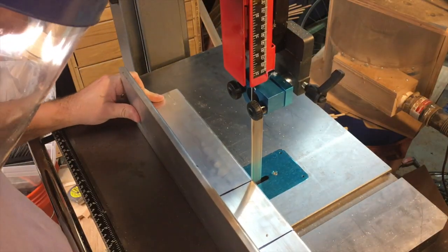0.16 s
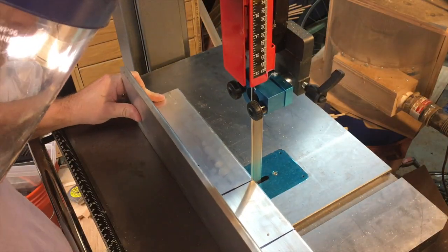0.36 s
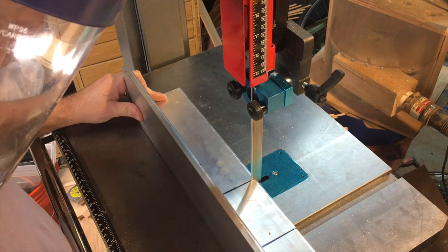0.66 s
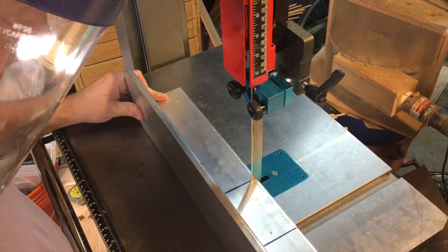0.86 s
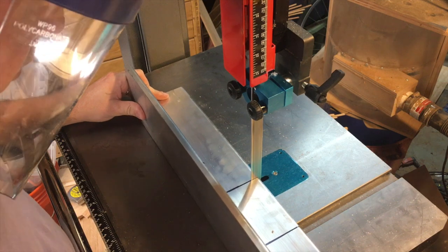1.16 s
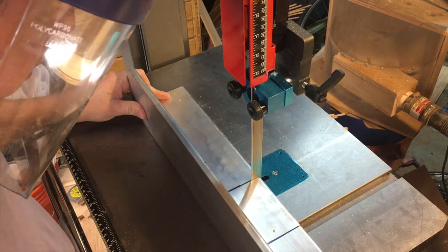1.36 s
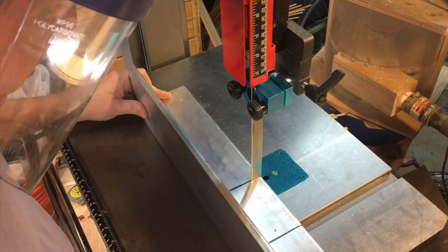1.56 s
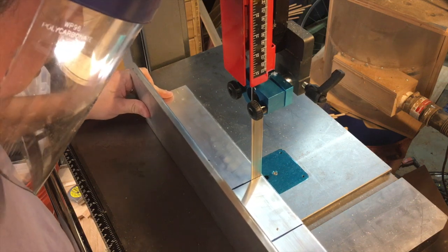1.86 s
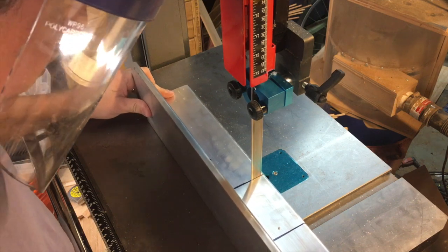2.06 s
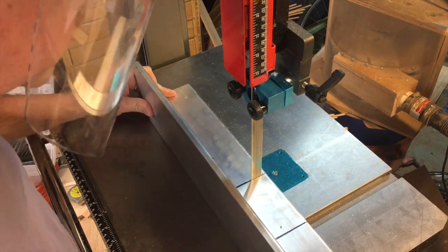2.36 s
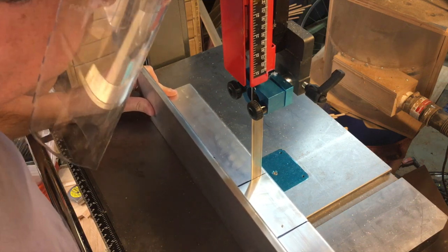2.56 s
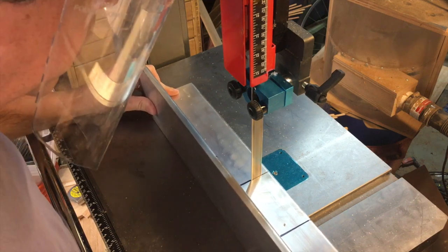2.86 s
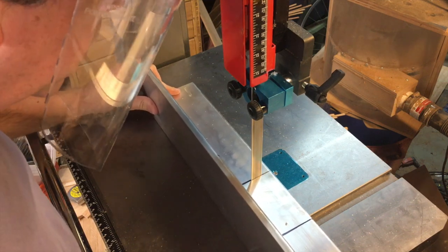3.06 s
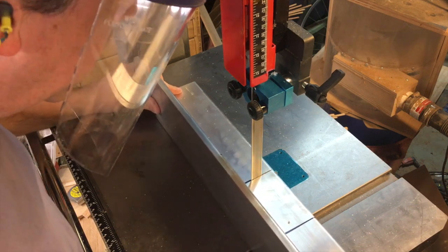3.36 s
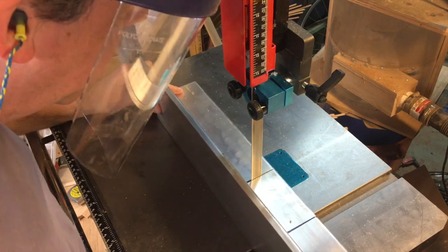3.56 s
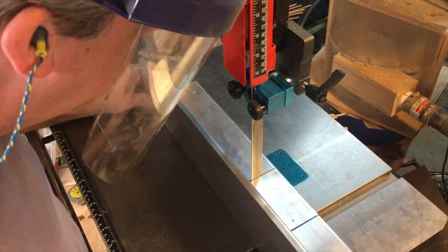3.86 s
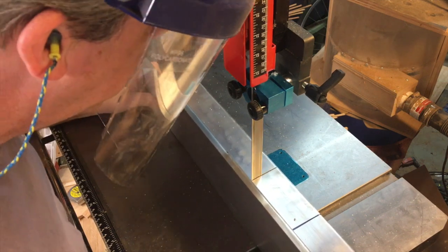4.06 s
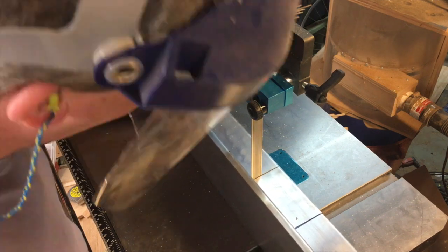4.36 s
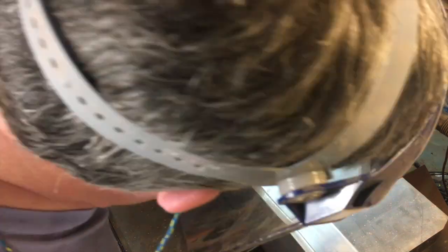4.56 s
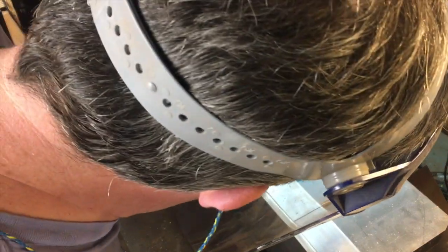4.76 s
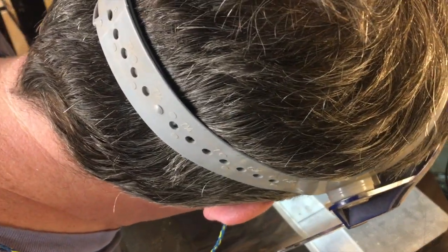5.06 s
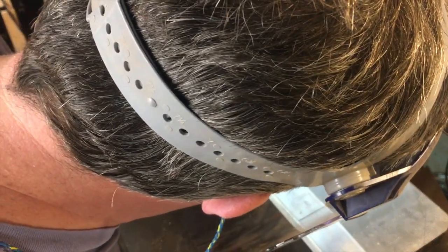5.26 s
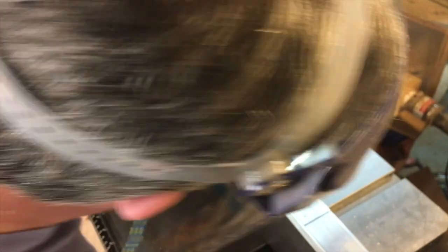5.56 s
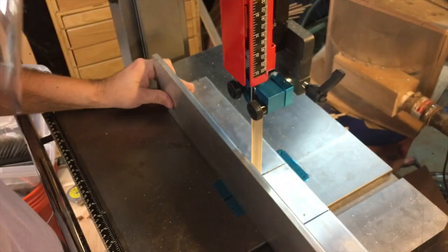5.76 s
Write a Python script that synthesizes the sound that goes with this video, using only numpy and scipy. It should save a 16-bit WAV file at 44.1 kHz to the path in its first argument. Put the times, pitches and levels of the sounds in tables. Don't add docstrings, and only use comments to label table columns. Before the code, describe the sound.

Continuous metal sawing, already under way at the start and never stopping. Teeth hiss and chatter sharply through plate, with shifting high rings, over throbbing motor hum and an extractor's constant whine. Around one and a half to two seconds the frame sings loudest; later the cutting becomes softer and duller, and a faint falling moan passes. Close, thin phone sound with little bass.

```python
import sys
import numpy as np
from scipy import signal
from scipy.fft import rfft, irfft, next_fast_len
from scipy.io import wavfile

SR = 44100
rng = np.random.default_rng(int(sys.argv[2]) if len(sys.argv) > 2 else 0)


def boost(x):
    u = np.asarray(x, float) / 20
    return 10 ** u


def put_to_file(sound):
    columns = np.atleast_2d(sound).T
    safe = np.clip(columns, -1, 1)
    whole_steps = np.round(safe * 32767)
    wavfile.write(sys.argv[1], SR, whole_steps.astype(np.int16))


N = 261513
TIME = np.arange(N) / SR


def rms_one(x):
    return x / np.sqrt(np.mean(x ** 2) + 1e-20)


def in_time(rows):
    s, *columns = np.transpose(rows)
    return [np.interp(TIME, s, c) for c in columns]


def drift(rate_hz):
    pole = np.exp(-80 * np.pi * rate_hz / SR)
    white = rng.standard_normal(N // 40 + 2002)
    slow = signal.lfilter([1], [1, -2 * pole, pole * pole], white)[2000:]
    return np.interp(np.arange(N) / 40, np.arange(len(slow)), rms_one(slow - slow.mean()))


def coloured(x, points):
    size = next_fast_len(N)
    bin_hz = np.maximum(np.arange(size // 2 + 1) * SR / size, 1)
    point_hz, point_db = np.transpose(points)
    gain = boost(np.interp(np.log(bin_hz), np.log(point_hz), point_db))
    return rms_one(irfft(rfft(x, size) * gain, size)[:N])


def resonate(x, hz, width_hz):
    r = np.exp(-np.pi * width_hz / SR)
    poles = [1, -2 * r * np.cos(2 * np.pi * hz / SR), r * r]
    return signal.lfilter([(1 - r * r) / 2, 0, (r * r - 1) / 2], poles, x)


def body(x, modes):
    total = 0
    for k, (hz, width_hz, db) in enumerate(modes):
        total = total + (-1) ** k * boost(db) * resonate(x, hz, width_hz)
    return rms_one(total)


def ring(shake, hz, width_hz):
    pole = np.exp(-1.5 * np.pi * width_hz / SR)
    swing = signal.lfilter([1], [1, -2 * pole, pole ** 2], shake)
    cycles = np.cumsum(hz + np.zeros(len(shake))) / SR
    return rms_one(np.real(swing * np.exp(2j * np.pi * cycles)))


def spell(start_s, end_s, fade_s):
    return np.clip(np.minimum(TIME - start_s, end_s - TIME) / (2 * fade_s) + .5, 0, 1)


def order(turns, multiple, slip_rad, start_cycles):
    phase = 2 * np.pi * (multiple * turns + start_cycles) + slip_rad * drift(3.6)
    return np.sqrt(2) * np.sin(phase)


def tone(hz, wobble_hz, rate_hz):
    cycles = np.cumsum(hz + wobble_hz * drift(rate_hz)) / SR + rng.random()
    return np.sqrt(2) * np.sin(2 * np.pi * cycles)


def span_tone(rows, wobble_hz, fade_s=0.044):
    hz, level_db = in_time(rows)
    to_edge_s = np.minimum(TIME - rows[0][0], rows[-1][0] - TIME)
    gate = np.clip(to_edge_s / fade_s + 1, 0, 1)
    return gate * boost(level_db) * tone(hz, wobble_hz, 4.1)


def shaft_turns():
    # time in seconds, speed in turns per second.
    shaft = [(0, 25.86), (1, 25.81), (2.3, 25.74), (4.2, 25.74), (4.6, 25.81), (4.9, 25.75), (5.4, 25.78),
             (5.93, 25.9)]
    return np.cumsum(in_time(shaft)[0]) / SR


def bite(turns):
    turn_throb = [(1, .04), (3, .06), (4, .06), (5, .04), (6, .08), (7, .05)]
    # time in seconds, extra level in dB, half length in seconds.
    catches = [(.116, 2, .01), (.993, 2.5, .004), (1.19, 2, .008), (1.267, 2.5, .01), (1.405, 2.5, .008),
               (1.732, 2, .008), (1.926, 2, .005), (2.275, 2.5, .005), (2.57, 3, .01), (3.072, 4, .002),
               (3.118, 5, .004), (3.198, 6, .003), (3.281, 7.5, .005), (5.473, 3, .006)]
    teeth_per_turn = 7.712
    tooth = 2 * np.pi * teeth_per_turn * turns
    teeth = 1 + .14 * np.cos(tooth) + .05 * np.cos(2 * tooth)
    throb = 1 + sum(depth * np.cos(2 * np.pi * (k * turns + rng.random())) for k, depth in turn_throb)
    catch_db = sum(db * np.exp(-((TIME - s) / half_s) ** 2) for s, db, half_s in catches)
    return teeth * throb * boost(catch_db + .5 * drift(150.0))


def scrape(force):
    # time in seconds, scrape level in dB, head shadow from 0 to 1.
    cut = [
        (0, -26, 0),
        (1.2, -26, 0.04),
        (2.3, -25, .05),
        (2.9, -25, .1),
        (3.35, -27.5, .5),
        (4.2, -27.5, .55),
        (4.6, -29.5, 0.95),
        (5.93, -30.5, 0.98),
    ]
    # frequency in Hz, density in dB per Hz.
    scrape_bright = [(1000, -4), (1700, -8), (3400, -1), (4600, -5), (5900, -2.5), (7200, 5.5), (8800, -2),
                     (9800, 4.5), (10700, -3), (12000, -3.5), (13500, -0.5), (14700, -10), (15700, 0.5)]
    scrape_dull = [(1000, -3), (1700, -1.5), (3400, -0.5), (4600, -0.5), (5900, 1.5), (7000, 0.5),
                   (8300, -0.5), (9600, 1.5), (10900, -6.5), (12200, -2.5), (13200, -6), (15000, -10),
                   (15700, -7)]
    scrape_db, shadow = in_time(cut)
    shadow = np.clip(shadow, 0, 1)
    ripple = np.transpose([np.linspace(500, 16500, 320), 2.2 * rng.standard_normal(320)])
    chips = coloured(force * rng.standard_normal(N), ripple)
    hiss = (1 - shadow) * coloured(chips, scrape_bright) + shadow * coloured(chips, scrape_dull)
    total, edges_hz = 0, np.geomspace(1200, 19500, 14)
    for k, (low_hz, high_hz) in enumerate(zip(edges_hz, edges_hz[1:])):
        sos = signal.butter(2, [low_hz, high_hz], "band", fs=SR, output="sos")
        flutter = boost(.5 * drift(12.0) + .5 * drift(5.3))
        total = total + (-1) ** k * flutter * signal.sosfilt(sos, hiss)
    return boost(scrape_db) * rms_one(total)


def rings(force):
    # time in seconds, frequency in Hz, level in dB rms.
    chatter = [(0, 6580, -28.5), (1.1, 6690, -28.5), (1.6, 6715, -27), (1.9, 6890, -31), (2.3, 6950, -37),
               (2.6, 6730, -30), (3.0, 6730, -33.5), (3.6, 6500, -34.5), (3.9, 6820, -37), (5.5, 6920, -37),
               (5.93, 6900, -52)]
    # start in seconds, end in seconds, frequency in Hz, width in Hz, level in dB rms.
    other_modes = [(-.3, 2.0, 6687, 12, -35.5), (2.5, 3.3, 6680, 25, -38), (5.3, 6.2, 6560, 150, -47),
                   (4.55, 5.6, 5600, 300, -41), (-.3, .8, 8050, 170, -34), (1.2, 1.5, 8150, 350, -35),
                   (1.65, 3.1, 8640, 120, -43), (2.5, 3.1, 7600, 90, -47), (-.3, 1.15, 9700, 800, -35),
                   (1.4, 3.1, 9930, 30, -41), (2.1, 2.95, 10050, 700, -34.5), (1.65, 2.7, 9415, 100, -42),
                   (4.6, 6.2, 9800, 80, -46), (-.3, 1.3, 6380, 250, -36),
                   (-.3, 1.2, 11400, 300, -33), (1.15, 1.65, 11570, 350, -36), (1.6, 2.55, 11335, 250, -37),
             (-.3, 1.2, 12318, 80, -38), (3.0, 3.75, 12380, 200, -42), (3.7, 4.3, 11950, 400, -40),
             (4.2, 4.62, 12150, 450, -38), (4.7, 6.2, 11720, 200, -42), (-.3, 1.8, 14410, 300, -46),
             (2.1, 2.7, 14800, 400, -51), (2.9, 5.7, 14250, 700, -47),
                   (1.75, 2.1, 3960, 70, -45), (2.05, 2.52, 3985, 110, -39.5), (-.3, 2.3, 2916, 40, -48),
             (2.25, 3.6, 2916, 30, -42.5), (-.3, 2.4, 3510, 50, -48), (3.8, 4.65, 2600, 70, -45),
             (1.6, 2.1, 2350, 60, -46), (4.6, 5.8, 2347, 60, -45), (3.1, 3.7, 3530, 200, -43),
             (1.05, 1.45, 3320, 200, -43), (4.1, 4.7, 5230, 150, -44), (3.6, 4.9, 3950, 200, -45),
             (5.62, 5.8, 712, 25, -45), (1.2, 3.7, 5280, 200, -44)]
    chatter_width_hz, fade_s = 300, .1
    white = [1, 1j] @ rng.standard_normal((2, N))
    chatter_hz, chatter_db = in_time(chatter)
    out = boost(chatter_db + 1.5 * drift(7.5)) * ring(force * white, chatter_hz, chatter_width_hz)
    for start_s, end_s, mode_hz, width_hz, db in other_modes:
        gate = spell(start_s, end_s, fade_s)
        alive = gate > 0
        shake = force * np.roll(white, rng.integers(N))
        out[alive] += boost(db) * np.sqrt(gate[alive]) * ring(shake[alive], mode_hz, width_hz)
    return out


def cutting(turns):
    force = bite(turns)
    return scrape(force) + rings(force)


def hum(turns, late):
    hum_order = [7.712, 15.424, 23.136, 30.848, 38.56, 33.42, 34, 38, 40.1, 41, 42, 43.6, 45, 46.15, 48,
                 48.9, 55, 59, 60, 72, 82.3, 83.3, 91, 101, 108.8]
    # early level in dB rms, late level in dB rms.
    hum_db = [(-68.5, -62), (-61, -58), (-56, -54), (-47.5, -47), (-63.5, -52), (-50, -52), (-60, -56.5),
              (-55, -52), (-55, -54), (-56, -53), (-58, -49), (-57, -56), (-58, -48), (-54, -58),
              (-48, -48), (-64.5, -56), (-53, -51), (-56, -53), (-56, -56), (-56, -59.5), (-60, -52),
              (-52, -65), (-54, -54), (-59.5, -52), (-68, -56)]
    lap_s, lap_at_s, lap_depth = .292, .87, .5
    lines = []
    for multiple, (early_db, late_db) in zip(hum_order, hum_db):
        level_db = early_db + late * (late_db - early_db) + 1.8 * drift(3.4)
        lines.append(boost(level_db) * order(turns, multiple, 0.5, rng.random()))
    lap = lap_depth * np.cos(2 * np.pi * (TIME - lap_at_s) / lap_s)
    return (1 + lap) * sum(lines[:5]) + sum(lines[5:])


def singing(turns):
    sing_order = [35, 36, 37, 35.6]
    # start in seconds, end in seconds, start level and end level in dB rms.
    sing = [
        [(0, 1.0, -46, -51), (1.5, 3.55, -44.5, -38), (3.8, 4.5, -46, -40.5), (4.55, 5.7, -41.5, -39)],
        [(.33, 1.15, -39.5, -33), (1.15, 2.24, -31, -28), (2.26, 2.45, -39, -43), (2.8, 4.4, -38.5, -38.5)],
        [(.3, 1.4, -43, -44), (2.3, 2.75, -43, -39), (3.3, 3.6, -43, -41), (3.85, 6, -41.5, -36.5)],
        [(4.451, 5.751, -38, -38)],
    ]
    rest_db, fade_s = -52, .08
    out = 0
    for multiple, spells in zip(sing_order, sing):
        loud = 0
        for start_s, end_s, start_db, end_db in spells:
            level = boost(np.interp(TIME, [start_s, end_s], [start_db, end_db]))
            loud = loud + spell(start_s, end_s, fade_s) * level
        level = np.maximum(boost(rest_db), loud) * boost(.5 * drift(4.0))
        out = out + level * order(turns, multiple, .2, 0)
    return out


def machine(turns):
    # frequency in Hz, density in dB per Hz.
    rumble_points = [(18, -81), (30, -65), (142, -41), (211, -16), (441, -17.5), (670, -9), (834, -8),
                     (922, -3), (1040, -6.5), (1285, -15.5), (1355, -6), (1470, -11), (1740, -28),
                     (2170, -10), (3500, -25), (4550, -19.5), (7700, -120)]
    # frequency in Hz, width in Hz, level in dB.
    frame_modes = [(218.5, 27, -11.5), (780, 150, -25), (933, 93, 0.5), (1190, 70, -8), (1550, 78, -2.5),
                   (2160, 170, -14.5)]
    shift_from_s, shift_over_s = 1.77, 1.3
    late = np.clip((TIME - shift_from_s) / shift_over_s, 0, 1)
    rumble = boost(-39.5 + 2.5 * late) * coloured(rng.standard_normal(N), rumble_points)
    knock = 1 + .5 * np.cos(2 * np.pi * turns) + 0.41 * np.cos(4 * np.pi * turns + 3.0)
    frame = boost(-39 + 1.0 * late) * body(knock * rng.standard_normal(N), frame_modes)
    return rumble + frame + hum(turns, late) + singing(turns)


def extractor_fan():
    # time in seconds, frequency in Hz, level in dB.
    fan = [(0, 1394, -36.5), (2.2, 1399, -35.8), (4.1, 1402.5, -34.2), (5.93, 1402.8, -33.6)]
    return boost(.8 * drift(10.0)) * span_tone(fan, wobble_hz=.6)


def blade_moans():
    # time in seconds, frequency in Hz, level in dB.
    moans = [
        [(.74, 336, -58), (1.04, 368, -56)],
        [(4.33, 395, -56), (4.41, 408, -51), (4.51, 323, -51), (4.8, 311, -52), (5.11, 280, -56)],
    ]
    return sum(span_tone(rows, wobble_hz=1.1) for rows in moans)


def scene():
    turns = shaft_turns()
    return (cutting(turns) + machine(turns) + extractor_fan() + blade_moans())[None]


def low_pass(x):
    return signal.sosfilt(signal.butter(12, 16620, fs=SR, output="sos"), x)


def record(dry):
    low_cut = signal.butter(4, 170, "high", fs=SR, output="sos")
    top_cut = signal.ellip(16, .3, 80, 15730, fs=SR, output="sos")
    bass = coloured(rng.standard_normal(N), [(20, -10), (120, 4), (200, -22.5)])
    faint = boost(-74.5 + 4.6 * drift(2.0)) * bass
    mix = signal.sosfilt(top_cut, signal.sosfilt(low_cut, dry) + faint)
    return low_pass(mix)


dry = scene()
out = record(dry)
put_to_file(out)
```